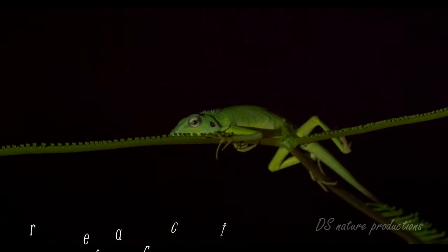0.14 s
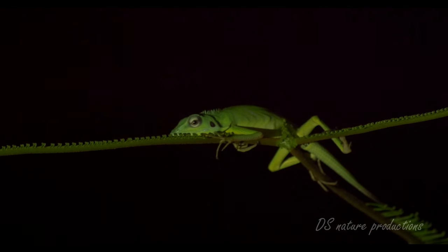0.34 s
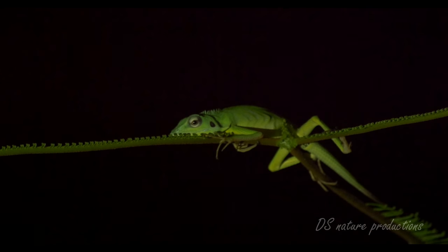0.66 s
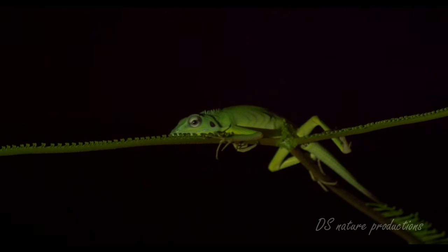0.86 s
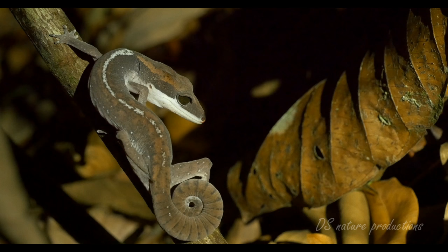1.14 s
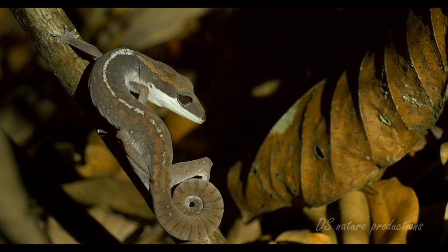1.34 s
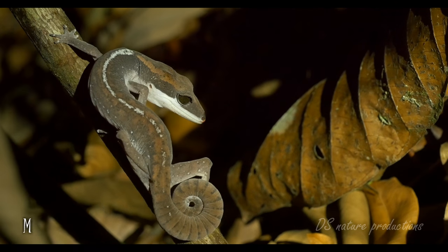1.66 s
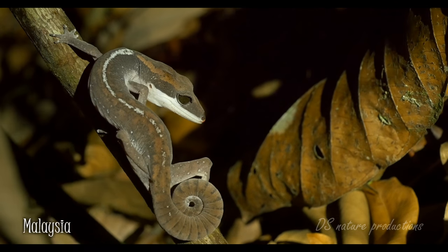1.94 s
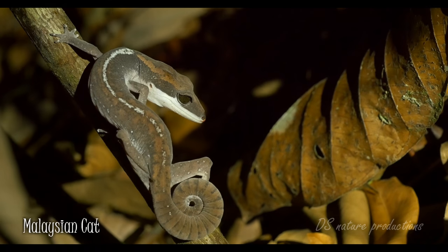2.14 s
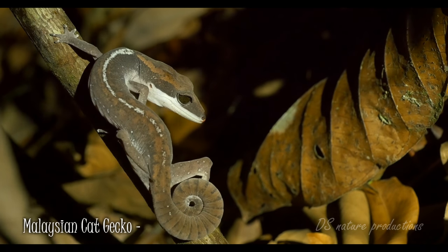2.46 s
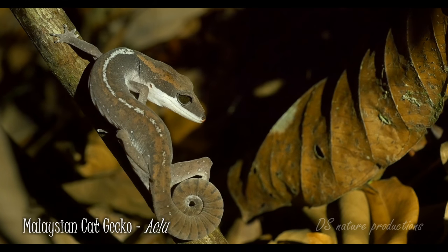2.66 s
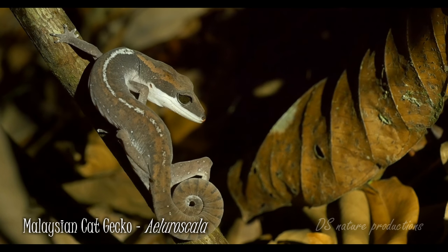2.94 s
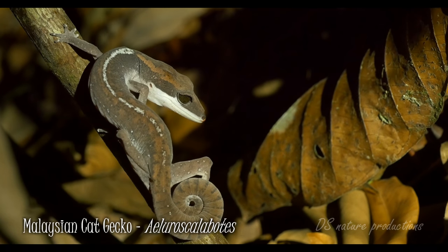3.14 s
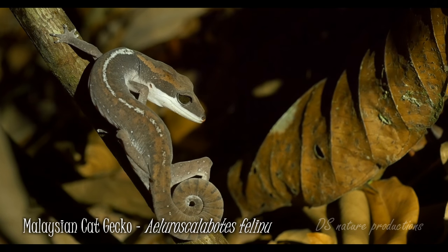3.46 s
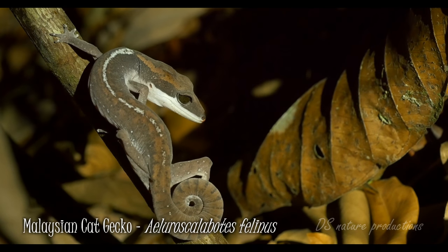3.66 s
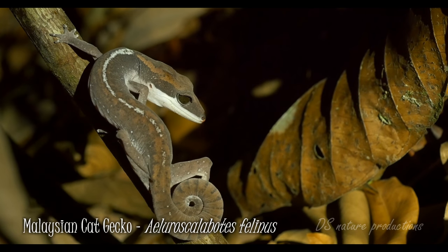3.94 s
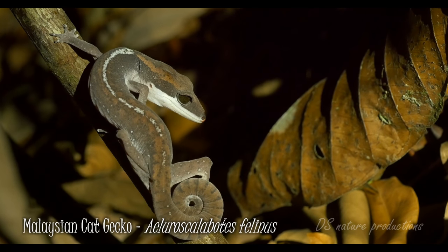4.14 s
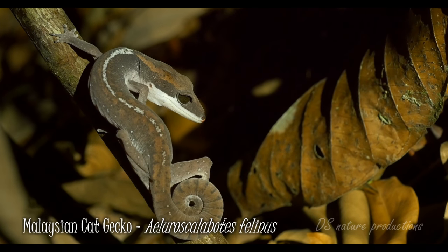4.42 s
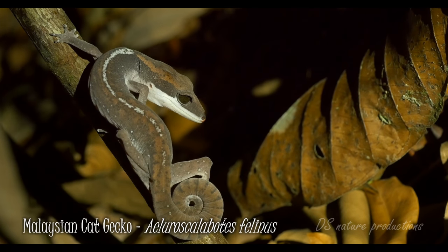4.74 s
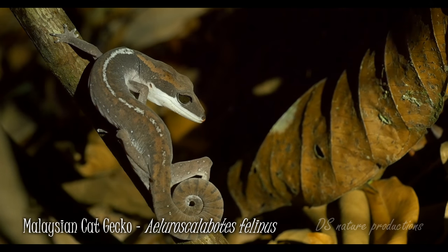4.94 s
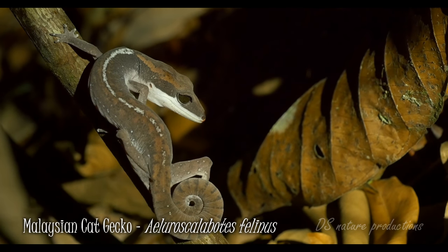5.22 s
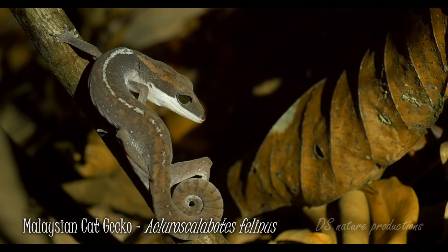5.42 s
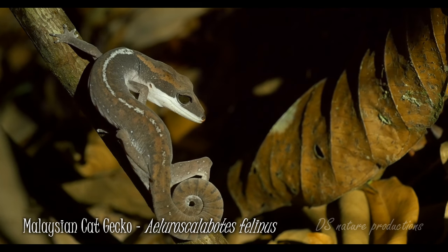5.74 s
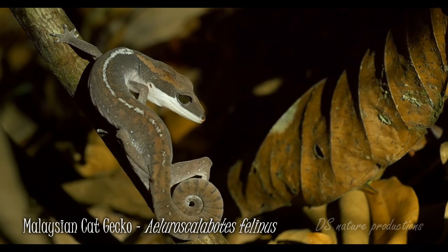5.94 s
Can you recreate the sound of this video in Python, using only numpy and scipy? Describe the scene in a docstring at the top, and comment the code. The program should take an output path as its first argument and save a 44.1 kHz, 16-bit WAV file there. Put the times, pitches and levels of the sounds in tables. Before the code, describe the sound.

Rainforest night: dense shrill crickets and rapid peeping tree frogs, then an abrupt cut to a calmer insect drone with one loud rattling croak.

```python
"""Rainforest night, two spots

A loud spot, then after a hard cut a calmer one. Crickets, katydids and a buzz are narrow rung bands;
a cicada is a comb of click-rate multiples; tree frogs are short decaying sines; two frogs croak as
throat pulses through two resonances. Chirps, ticks, drips and knocks are short rings.
Trees add sparse echoes; far leaves and water are shaped noise underneath."""
import sys
import numpy as np
from scipy import signal
from scipy.io import wavfile
from scipy.ndimage import uniform_filter1d

SR = 44100
rng = np.random.default_rng(int(sys.argv[2]) if len(sys.argv) > 2 else 0)


def persist_wave(psi):
    """Save psi, clipped to +-1, as 16-bit WAV."""
    counts = np.round(np.clip(psi, -1, 1) * 32767).astype(np.int16)
    wavfile.write(sys.argv[1], SR, np.atleast_2d(counts).T)


N = 268128
T = np.arange(N) / SR
CUT_S, MEET_S = 1.1935, .012  # what starts or stops within MEET_S of the cut is moved onto it
EDGE_HZ = 15700
EDGE_DB = -10  # level a phrase swells from and fades to
WANDER_HZ = 3.6  # speed of a singer's level drift
BUZZ_RISE_S, BUZZ_FALL_S, BUZZ_SAG_HZ = .12, .17, 90.2
TRILL_PULSE_S, TRILL_PER_S = 5.4215, 31.87  # time of one pulse, pulse rate
CICADA_HALF_WIDTH_HZ, CICADA_RISE_S, CICADA_FALL_S = 155, .059, .065
WHISTLE_T60_S, WHISTLE_SETTLE_HZ, WHISTLE_HOLD = .095, 14.47, 2.2  # hold > 1: sustain, then drop
LOW_WHISTLE_T60_S, LOW_WHISTLE_PAN_DB = .15, 1

# singers' phrases: start t/s, length/s, level/dB, f/Hz
FAR_WHISTLES = [(1.32, 0.41, -52, 1325), (4.6, 0.37, -51.5, 1325), (5.05, 0.18, -58, 1330)]
CRICKET_LOW = [(0, 1.19, -53, 3345), (1.2, 4.9, -53, 3345)]
CRICKET_NEAR = [(0, 1.19, -35, 5215)]
CRICKET_PAIR = [(.02, 1.17, -41, 4596)]
CRICKETS_MID = [(0, 1.19, -43.5, 4770)]
SHORT_TRILLS = [(1.2, .43, -55, 5580), (2.31, 0.21, -55, 5670), (2.54, 1.24, -51.5, 5730),
                (3.79, .45, -48.5, 5680)]
THIN_LINE = [(1.2, .25, -59, 5940), (1.88, .27, -52, 5880)]
TRILL = [(4.2, .42, -47, 5625), (4.55, 1.6, -43, 5685)]
SWELLING_BUZZ = [(0, 1.19, -42, 4135), (1.2, 4.9, -43.5, 4148)]
RASP = [(2.3, .66, -46, 2986)]
KATYDIDS_6K8 = [(0.0054, 0.92, -46, 6800)]
KATYDID_6K5 = [(1.2, 0.45, -51, 6510), (1.85, 1.15, -54.5, 6510), (3.2, 0.56, -48, 6600),
               (4.6, 1.5, -56, 6515), (1.2, 2.55, -56, 6830), (5.2, .9, -52, 6800)]
KATYDIDS_8K = [(0, 1.19, -34, 7920), (1.2, 0.061, -48, 7900), (1.2, 4.9, -53.5, 7970)]
KATYDID_8K8 = [(1.92, 1.08, -54.5, 8770)]
KATYDID_10K = [(.03, 0.23, -47.5, 9960), (.3, .26, -54.5, 10400), (.56, 0.24, -46.5, 10000),
               (.77, .22, -53.5, 10450), (.99, .2, -46.5, 9970)]
# fainter frogs and noise beds: start t/s, length/s, level/dB, f/Hz
FAR_CROAKS = [(2.62, .65, -51, 1100), (4.7, .36, -55, 1157)]
HIGH_RUSTLE = [(.25, .38, -56, 12000), (.7, .36, -53, 13000), (1.2, 4.9, -71, 12600),
               (1.24, 0.26, -55, 12200), (1.65, 0.4, -58, 13500), (2.5, .3, -56, 12400),
               (3.4, .3, -59, 12300), (3.93, .24, -64, 13000), (4.33, .3, -55, 12300),
               (5.0, 0.69, -63, 13200), (5.8, .27, -50, 11800)]
MID_WASH = [(.48, .71, -56.5, 685)]
WIND = [(.1, 0.47, -66, 40), (.48, .18, -61, 40), (.72, .2, -55, 38), (1.0, .19, -61, 39.8)]
# buzz swells: crest t/s, lift/dB
BUZZ_SWELLS = [(-.02, 7), (0.461, 8.5), (.95, 9), (1.46, 7.5), (1.99, 8.5), (2.508, 7), (3.009, 7.5),
               (3.559, 7.5), (4.059, 6.5), (4.55, 7), (5.099, 8), (5.651, 8.5), (6.12, 9)]
# cicada phrases: start t/s, length/s, first level/dB, last level/dB, first body f/Hz, last body f/Hz,
# left minus right/dB, blur/0-1
CICADA = [(0, 1.19, -48, -39, 4780, 4750, 9, 0.5), (1.193, 1, -39.5, -37, 4750, 4790, 6, 0.03),
          (2.147, 0.16, -45, -49, 4680, 4650, -3, 0.4), (2.563, 0.42, -39, -40, 4770, 4700, 4, 0.63),
          (3.014, 0.79, -36, -37, 4750, 4665, 1.5, 0.31), (3.809, 1.42, -35.5, -43, 4700, 4790, -3, 0.31),
          (5.26, .45, -44, -45, 4760, 4840, 14, 0.42), (5.69, 0.41, -38.5, -40, 4730, 4740, 6.5, 0.58)]
# cicada clicks: t/s, rate/(clicks per s)
CLICK_RATE = [(1.2, 151.8), (2.3, 151.8), (2.55, 162.4), (3.35, 161.8), (3.85, 160.5), (4.15, 159.95),
              (4.95, 159.25), (5.35, 158.95), (6.08, 158.4)]
# tree frog notes: t/s, peak level/dB, f/Hz, left minus right/dB
WHISTLES = [(0.0014, -32.5, 2940, 9.5), (0.0445, -34, 2960, -1), (0.089, -30, 2940, 12),
            (0.1527, -34, 2940, 3.5), (0.1954, -47, 2950, 1.0), (0.2338, -34, 2930, 5),
            (0.284, -31, 2970, 12), (0.3507, -35, 2950, -3.0), (0.3849, -35, 2960, 15),
            (0.407, -33, 2947, 5.5), (0.463, -31, 2940, 3.5), (0.5084, -37.5, 2940, 4),
            (0.56, -42, 2930, 12), (0.623, -33.5, 2955, 15.5), (0.6908, -33, 2956, 8),
            (0.7411, -31.5, 2935, 10), (0.803, -34, 2950, 3), (0.8511, -38, 2954, 2.0),
            (0.9674, -29.5, 2954, 15.5), (1.052, -31.5, 2960, 4), (1.0939, -40, 2930, 14),
            (1.1406, -34, 2950, 1.0), (2.9377, -38, 2990, 9), (2.979, -32, 2968, 9),
            (3.0394, -36.5, 2967, 1.0), (3.0961, -40, 2960, -3), (3.1378, -36, 2970, 2),
            (4.2434, -40, 2960, 11), (4.2757, -39, 2964, 10), (4.315, -33.5, 2956, -3),
            (4.3892, -40, 2960, -3), (4.4372, -39, 2960, 4.5), (4.4933, -41.5, 2960, 9),
            (4.5394, -49, 2960, 2.0), (4.6588, -38.5, 3000, 10), (4.699, -38.5, 2970, 12),
            (4.7328, -33, 2960, -2.0), (4.7812, -41, 2960, 6), (4.8157, -43, 2960, 2.5),
            (4.8596, -34.5, 2970, 0.5), (4.9087, -38.5, 2970, 0), (4.948, -44, 2970, -3),
            (5.002, -52, 2920, -2.0)]
# lower tree frog notes: t/s, peak level/dB, f/Hz
LOW_WHISTLES = [(0.3804, -41, 2200), (0.4134, -35.5, 2200), (0.4654, -30.5, 2220), (0.5134, -29.5, 2220),
                (0.5731, -44, 2210), (0.6205, -48, 2230), (0.6594, -53, 2230), (0.7602, -50, 2220),
                (0.8026, -47, 2230), (0.8599, -51, 2210), (0.9173, -51, 2220), (1.1368, -47, 2230),
                (6.0284, -43.5, 2160)]
# croak tracks: t/s, lower resonance level/dB, upper over lower/dB, lower f/Hz, upper f/Hz
CROAK_LOUD = [(1.78, -56, -5, 1100, 1600), (1.794, -43, 1, 1090, 1530), (1.83, -42.5, 3.5, 1200, 1510),
              (1.93, -43, 0.5, 1160, 1600), (2.02, -41.5, 1, 1126, 1700), (2.12, -42, -4, 1110, 1860),
              (2.225, -43, -7.5, 1130, 1970), (2.26, -57, 4, 1160, 1900)]
CROAKS_THIN = [
    [(0.07, -88, 16, 1110, 2810), (0.09, -38.5, -17, 1130, 2860), (0.108, -44, 8, 1220, 2800),
     (0.134, -42, 7, 1336, 2730), (0.382, -50.5, 8, 1350, 2770), (0.5, -61, 2, 1330, 2830)],
    [(1.1, -62, -2, 1157, 2820), (1.122, -41, 3, 1170, 2790), (1.19, -42.5, 9, 1410, 2780)],
]  # one such track per croak
# pushes of air in the loud croak: t/s, level/dB (relative levels only)
AIR_PUSHES = [(1.7873, -35), (1.8098, -30.5), (1.833, -26), (1.859, -29.5), (1.8784, -30), (1.905, -27),
              (1.9204, -29), (1.945, -30), (1.9759, -31), (2.0044, -31.5), (2.0363, -28), (2.0622, -31),
              (2.088, -31.5), (2.1041, -27), (2.1271, -30), (2.152, -29.5), (2.1784, -32), (2.196, -32),
              (2.2059, -31.5), (2.2234, -31)]
# katydid chirps and ticks, knocks: t/s, peak level/dB
CHIRPS = [(2.105, -37.5), (2.282, -43), (3.2745, -37.5), (3.389, -44), (4.425, -38), (5.549, -37),
          (5.632, -47)]
TICKS = [(1.45, -45), (2.661, -44), (3.849, -45), (5.001, -41)]
KNOCKS = [(.492, -35.5), (.749, -45)]
# drips: t/s, peak level/dB, f/Hz
DRIPS = [(.486, -46, 894), (.887, -42.5, 1040), (1.229, -39, 1010), (2.899, -39, 989), (4.908, -41, 980)]
# far hiss spectrum at each spot: f/Hz, level/(dB per Hz)
HISS_LOUD = [(25, -92), (60, -88), (150, -77.5), (300, -81.5), (700, -90.5), (1900, -85), (3600, -78.5),
             (4500, -70.5), (5500, -64), (6200, -81.5), (7200, -71.5), (8600, -100), (9200, -99),
             (15700, -104)]
HISS_CALM = [(25, -95.5), (70, -85.5), (160, -78.5), (300, -82), (900, -84.5), (2500, -87.5), (3600, -82.5),
             (5200, -80), (6300, -83.5), (7500, -84), (8500, -92.5), (9300, -95), (12000, -101),
             (15700, -105)]
# hiss: f/Hz, left-right correlation/1
HISS_SAME = [(25, 0.45), (60, 0.28), (125, 0.61), (300, 0.41), (1000, 0.71), (3000, 0.25), (12000, 0.011)]

# phrases and way of singing; arguments as in singer()
SINGERS = [
    (FAR_WHISTLES, dict(steady=.37, strokes_per_s=370, width_hz=51, throbs_per_s=16.5, depth=.24,
                        same=.88, pan_db=4.5, rise_s=.083, fall_s=.3)),
    (CRICKET_LOW, dict(steady=.54, strokes_per_s=500, width_hz=85, throbs_per_s=29, depth=.57,
                       pan_db=-7.5, wander_db=.5)),
    (CRICKET_NEAR, dict(steady=.5, strokes_per_s=700, width_hz=110, throbs_per_s=40, depth=.3,
                        pan_db=-7, wander_db=1.6)),
    (CRICKET_PAIR, dict(steady=.82, strokes_per_s=390, width_hz=42, throbs_per_s=25, depth=.15,
                        pan_db=-8, rise_s=.42)),
    (CRICKETS_MID, dict(steady=.12, strokes_per_s=1500, width_hz=180, throbs_per_s=67, depth=.26,
                        pan_db=-8)),
    (SHORT_TRILLS, dict(steady=.08, strokes_per_s=900, width_hz=220, throbs_per_s=31, depth=.13,
                        pan_db=1)),
    (THIN_LINE, dict(steady=.4, strokes_per_s=400, width_hz=65, throbs_per_s=30, depth=.3,
                     rise_s=.16, fall_s=.1)),
    (RASP, dict(steady=.043, strokes_per_s=340, width_hz=320, throbs_per_s=40, depth=.22,
                pan_db=5, rise_s=.26, fall_s=.01)),
    (KATYDIDS_6K8, dict(steady=.03, strokes_per_s=1800, width_hz=290, throbs_per_s=48, depth=.2,
                        same=.22, pan_db=5.5)),
    (KATYDID_6K5, dict(steady=.1, strokes_per_s=440, width_hz=90, throbs_per_s=33, depth=.2,
                       same=.05, rise_s=.36, fall_s=.58, wander_db=3)),
    (KATYDIDS_8K, dict(steady=.03, strokes_per_s=1500, width_hz=450, throbs_per_s=117, depth=.17,
                       same=.1, pan_db=3.5, wander_db=1.2)),
    (KATYDID_8K8, dict(steady=.25, strokes_per_s=360, width_hz=270, throbs_per_s=110, depth=.29,
                       same=.099, pan_db=-10, rise_s=.3, fall_s=.12)),
    (KATYDID_10K, dict(steady=.03, strokes_per_s=2000, width_hz=310, throbs_per_s=100, depth=.18,
                       same=.2, pan_db=2.5, rise_s=.024, fall_s=.052)),
    (HIGH_RUSTLE, dict(steady=.01, strokes_per_s=9000, width_hz=4200, throbs_per_s=30, depth=.1,
                       same=.043, rise_s=.17, fall_s=.2)),
    (FAR_CROAKS, dict(steady=.01, strokes_per_s=400, width_hz=670, throbs_per_s=35, depth=.13,
                      same=.57, pan_db=4.5, rise_s=.2, fall_s=.47)),
    (MID_WASH, dict(steady=.01, strokes_per_s=3000, width_hz=920, throbs_per_s=8.1, depth=.089,
                    same=.76, pan_db=3.5, rise_s=.0059)),
    (WIND, dict(steady=.01, strokes_per_s=300, width_hz=32, throbs_per_s=4.2, depth=.3,
                same=.8, pan_db=4, rise_s=.12, fall_s=.14)),
]


def gain_of(db):
    """Amplitude factor of a level."""
    return 10 ** (np.asarray(db) / 20)


def evened(x):
    """Scale to unit RMS along the last axis."""
    return x / np.sqrt(np.mean(abs(x) ** 2, -1, keepdims=True) + 1e-20)


def read(points, hz):
    """Interpolate a spectrum table over log frequency."""
    f, value = np.transpose(points)
    return np.interp(np.log(hz + 1), np.log(f + 1), value)


def sides(pan_db):
    """Left and right gains for a level difference."""
    return gain_of(np.array([pan_db, -pan_db]) / 2)


def ring(x, corner_hz):
    """Two one-pole smoothers, 6 dB down at the corner: a resonance seen from its own centre."""
    r = np.exp(-2 * np.pi * corner_hz / SR)
    return signal.lfilter([(1 - r) ** 2], [1, -2 * r, r * r], x)


def carrier(hz):
    """Complex tone following hz, random start phase."""
    return np.exp(2j * np.pi * (np.cumsum(hz) / SR + rng.random()))


def phrase(start, length, rise_s, fall_s):
    """Times, slice and swell in dB; what meets the cut or an end of the scene is in full voice there."""
    end = start + length
    start_cut, end_cut = abs(start - CUT_S) < MEET_S, abs(end - CUT_S) < MEET_S
    start, end = CUT_S if start_cut else start, CUT_S if end_cut else end
    span = slice(max(round(start * SR), 0), min(round(end * SR), N))
    t = T[span]
    rise = 1 if start_cut or start < .01 else (t - start) / rise_s
    fall = 1 if end_cut or end > T[-1] else (end - t) / fall_s
    return t, span, EDGE_DB * (1 - np.clip(np.minimum(rise, fall), 0, 1)) + 0 * t


def singer(row, steady, strokes_per_s, width_hz, throbs_per_s, depth, same=.62, pan_db=-1.0,
           rise_s=.018, fall_s=.079, wander_db=2.0, beat=None, swell=None):
    """A wing or throat rings at its pitch: steady tone plus chance strokes, throbbing in level.

    steady: power share of tone; width_hz: 6 dB down; depth: 0-1; same: left-right shared power;
    pan_db: left minus right.
    """
    start, length, db, hz = row
    t, span, shape_db = phrase(start, length, rise_s, fall_s)
    lift_db, shift_hz = swell(t) if swell else (0, 0 * t)
    wander = evened(ring(rng.standard_normal(len(t)), WANDER_HZ))
    db = db + shape_db + lift_db + wander_db * wander

    struck = rng.random((3, len(t))) < strokes_per_s / SR
    hits = struck * np.exp(2j * np.pi * rng.random(struck.shape))
    hits = hits * gain_of(1.7 * rng.standard_normal(struck.shape))
    shared, left, right = evened(ring(hits, width_hz / 1.94))
    rung = np.sqrt(same) * shared + np.sqrt(1 - same) * np.array([left, right])

    pace = 1 + .14 * evened(ring(rng.standard_normal(len(t)), 7.15))
    uneven = np.cumsum(throbs_per_s * pace) / SR + rng.random()
    turns = beat(t) if beat else uneven
    throb = 1 - depth * (1 - np.cos(np.pi * turns) ** 4)
    body = (np.sqrt(steady) + np.sqrt(1 - steady) * rung) * evened(throb)
    tone = np.sqrt(2) * (body * carrier(hz + shift_hz)).real
    return span, tone * gain_of(db) * sides(pan_db)[:, None]


def trill(row):
    """One cricket gives short tone pulses at a strict beat."""
    return singer(row, steady=.68, strokes_per_s=900, width_hz=150, throbs_per_s=TRILL_PER_S,
                  depth=.75, pan_db=-2.2, rise_s=.15, wander_db=2.1,
                  beat=lambda t: (t - TRILL_PULSE_S) * TRILL_PER_S)


def buzz(row):
    """An insect buzz swells about twice a second, its pitch sinking at each crest."""
    def swell(t):
        s, lift_db = np.transpose(BUZZ_SWELLS)
        age = t[:, None] - s
        crest = np.exp(-(age / np.where(age < 0, BUZZ_RISE_S, BUZZ_FALL_S)) ** 2)
        return crest @ lift_db, -BUZZ_SAG_HZ * crest.sum(1)
    return singer(row, steady=.11, strokes_per_s=1500, width_hz=262, throbs_per_s=110, depth=.095,
                  same=.25, pan_db=1.2, wander_db=1.2, swell=swell)


def cicada(start, length, first_db, last_db, first_hz, last_hz, pan_db, blur):
    """Regular clicks ring a body: only nearby multiples of the click rate sound; strain blurs them."""
    t, span, shape_db = phrase(start, length, CICADA_RISE_S, CICADA_FALL_S)
    db = shape_db + np.linspace(first_db, last_db, len(t))
    body_hz = np.linspace(first_hz, last_hz, len(t))
    rate = np.interp(T, *np.transpose(CLICK_RATE))
    turns, rate = np.cumsum(rate)[span] / SR, rate[span]
    power, tone = 1e-9, 0
    for k in range(27, 34):
        size = 1 / (1 + ((k * rate - body_hz) / CICADA_HALF_WIDTH_HZ) ** 4)
        slow, fast = rng.standard_normal((2, 2, len(t))) + 1j * rng.standard_normal((2, 2, len(t)))
        paths = (1 + .45 * evened(ring(slow, 2.5))) / 1.1  # leaf echoes fade each line on its own
        line = np.sqrt(1 - blur) * paths + np.sqrt(blur) * evened(ring(fast, 51))
        power = power + size ** 2
        tone = tone + size * line * np.exp(2j * np.pi * k * turns)
    return span, np.sqrt(2 / power) * tone.real * gain_of(db) * sides(pan_db)[:, None]


def drone():
    """All insects, far frogs and noise beds, summed phrase by phrase."""
    parts = [singer(row, **way) for rows, way in SINGERS for row in rows]
    parts += [trill(row) for row in TRILL]
    parts += [buzz(row) for row in SWELLING_BUZZ]
    parts += [cicada(*row) for row in CICADA]
    out = np.zeros((2, N))
    for span, sound in parts:
        out[:, span] += sound
    return out


def blips(s, db, hz, t60, pan_db, rise_s, settle_hz=0, hold=1):
    """Short decaying sines, soft start; the pitch may settle from settle_hz above."""
    out, t = np.zeros((2, N + SR)), T[:SR // 4]
    shape = (1 - np.exp(-t / rise_s)) ** 2 * gain_of(-60 * (t / t60) ** hold)
    shape = shape / shape.max()
    for s, db, hz, pan_db in zip(*np.broadcast_arrays(s, db, hz, pan_db)):
        turns = hz * t + settle_hz * .047 * (1 - np.exp(-t / .047))
        note = gain_of(db) * shape * np.sin(2 * np.pi * turns)
        out[:, round(s * SR):][:, :len(t)] += sides(pan_db)[:, None] * note
    return out[:, :N]


def tree_frogs():
    """Two kinds of whistled notes: decaying sines, the higher kind settling in pitch."""
    s, db, hz, pan_db = np.transpose(WHISTLES)
    high = blips(s, db, hz, WHISTLE_T60_S, pan_db, rise_s=.0031,
                 settle_hz=WHISTLE_SETTLE_HZ, hold=WHISTLE_HOLD)
    low = blips(*np.transpose(LOW_WHISTLES), LOW_WHISTLE_T60_S, LOW_WHISTLE_PAN_DB,
                rise_s=.0032, hold=1.3)
    return high + low


def spread(rows):
    """Table columns at every sample of their span, with the slice and soft ends."""
    s, *columns = np.transpose(rows)
    s = np.where(abs(s - CUT_S) < MEET_S, CUT_S, s)
    span = slice(max(round(s[0] * SR), 0), min(round(s[-1] * SR), N))
    t = T[span]
    ends = np.minimum(t - s[0], s[-1] - t) / .00086
    ends = np.clip(ends + (t < .01) + (t > T[-400]), 0, 1)
    return span, ends, [np.interp(t, s, c) for c in columns]


def air_pushes():
    """Each push of air swells in a few ms and sags until the next."""
    s, db = np.transpose(AIR_PUSHES)
    span = slice(round(1.7 * SR), round(2.3 * SR))
    age = np.maximum(T[span, None] - s, 0) / .0055
    out = np.zeros(N)
    out[span] = evened(.2 + (gain_of(db - db.mean()) * age * np.exp(1 - age)).sum(1))
    return out


def croak(rows, pulses_per_s, jitter, low_corner_hz, high_corner_hz, pan_db, push=1):
    """Uneven throat pulses ring two moving resonances."""
    span, ends, (db, high_db, low_hz, high_hz) = spread(rows)
    pace = 1 + jitter * evened(ring(rng.standard_normal(len(db)), 60))
    turns = np.cumsum(pulses_per_s * pace) / SR
    pulses = np.diff(np.floor(turns), prepend=0) * gain_of(2.6 * rng.standard_normal(len(db)))
    pulses = pulses + .02 * rng.standard_normal(len(db))  # breath between pulses
    out = np.zeros(N)
    for hz, corner_hz, lift_db in (low_hz, low_corner_hz, 0), (high_hz, high_corner_hz, high_db):
        turn = carrier(hz)
        rung = turn * ring(ring(pulses / turn, corner_hz), corner_hz)  # twice: steep skirts
        out[span] += evened(rung.real) * gain_of(db + lift_db) * ends
    return sides(pan_db)[:, None] * out * push


def small_sounds():
    """Katydid chirps and ticks, drips, and knocks ringing a body plus a duller thump below."""
    knocks = np.transpose(KNOCKS)
    body = blips(*knocks, hz=298.6, t60=.12, pan_db=-7.5, rise_s=.002)
    thump = gain_of(-4) * blips(*knocks, hz=183, t60=.035, pan_db=-5.5, rise_s=.0045)
    chirps = blips(*np.transpose(CHIRPS), hz=8020, t60=.11, pan_db=6, rise_s=.002)
    ticks = blips(*np.transpose(TICKS), hz=7300, t60=.12, pan_db=7, rise_s=.0053)
    drips = blips(*np.transpose(DRIPS), t60=.026, pan_db=7.5, rise_s=.00073)
    return chirps + ticks + drips + body + thump


def trees(x, t60):
    """Trunks and leaves return sparse echoes of random sign, different for each ear."""
    taps, at = np.zeros((2, SR // 2)), np.arange(300, SR // 2 - 20, 20)
    at = at + rng.integers(0, 20, (2, len(at)))
    np.put_along_axis(taps, at, rng.choice([-1., 1.], at.shape), 1)
    taps *= gain_of(-60 * T[:SR // 2] / t60)
    return signal.fftconvolve(x, taps / np.linalg.norm(taps[0]), axes=1)[:, :N]


def hiss(spectrum, patchy_db):
    """Far leaves and water: shaped noise with drifting patches, left and right unlike in the treble."""
    noise = rng.standard_normal((2, N)) * np.sqrt(SR / 2)  # 0 dB per Hz
    hz, _, (a, b) = signal.stft(noise, SR, nperseg=1024, noverlap=768)
    patches = uniform_filter1d(rng.standard_normal(a.shape), 10, 0)
    patches = uniform_filter1d(patches, 12, 1)
    level_db = read(spectrum, hz)[:, None] + patchy_db * patches / patches.std()
    same = read(HISS_SAME, hz)[:, None]
    z = np.array([a, same * a + np.sqrt(1 - same ** 2) * b]) * gain_of(level_db)
    return signal.istft(z, SR, nperseg=1024, noverlap=768)[1][:, :N]


def scene():
    """Sum of all sources; tails and hiss belong to one spot each, so no tail crosses the cut."""
    thin = sum(croak(rows, 180, .16 / 1.5, 280, 230, 1.5) for rows in CROAKS_THIN)
    loud = croak(CROAK_LOUD, 202.5, .08, 165, 380, 5.5, air_pushes())
    small, peeps = small_sounds(), tree_frogs()
    out = drone() + loud + gain_of(-10) * trees(loud, .2)
    before = np.clip((CUT_S - T) * SR / 20, 0, 1)  # 20-sample crossfade
    for spot, spectrum in (before, HISS_LOUD), (1 - before, HISS_CALM):
        calls = thin + small + peeps
        tails = gain_of(-6) * trees((thin + small) * spot, .31)
        tails = tails + gain_of(-4) * trees(peeps * spot, .74)
        far = hiss(spectrum, 1.08) * gain_of([[.6], [-.6]])  # left a little louder
        out += spot * (calls + tails + far)
    return out


def record(dry):
    """Band limit: linear-phase low-pass at EDGE_HZ."""
    edge = signal.firwin(2047, EDGE_HZ, window=("kaiser", 10), fs=SR)
    return signal.oaconvolve(dry, edge[None], "same")


dry = scene()
out = record(dry)
persist_wave(out)
```